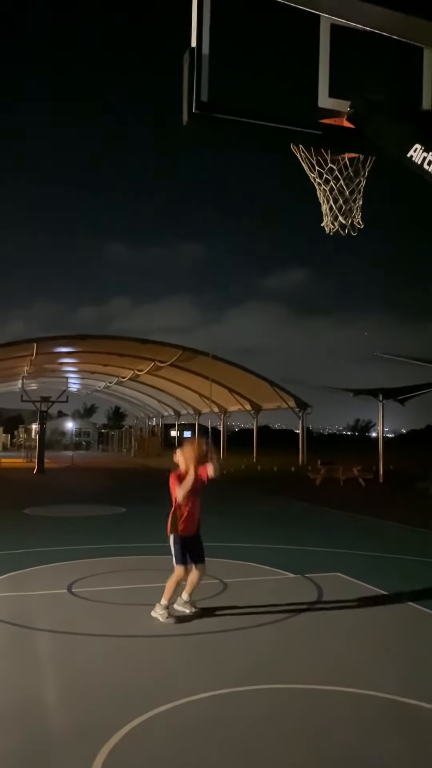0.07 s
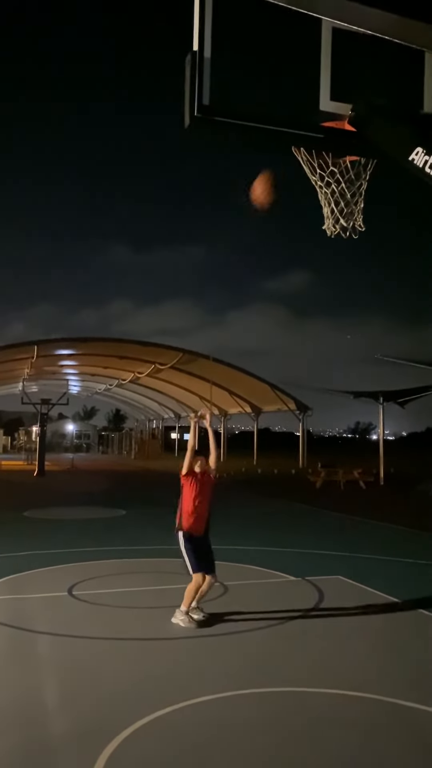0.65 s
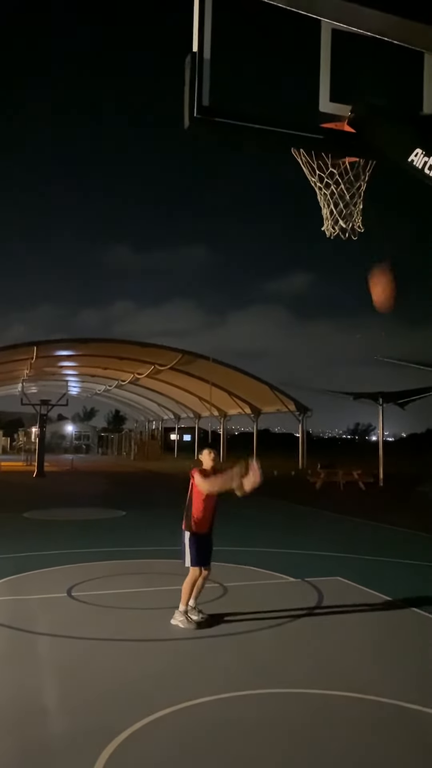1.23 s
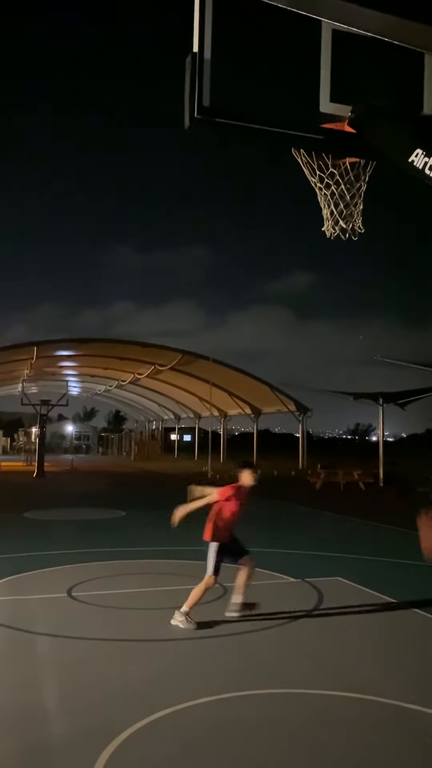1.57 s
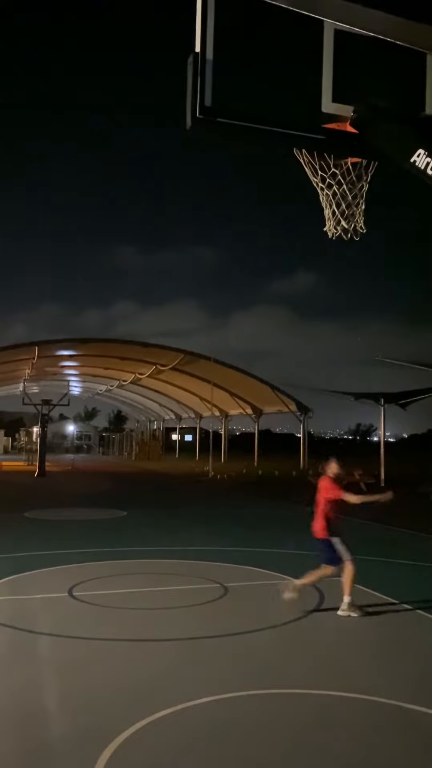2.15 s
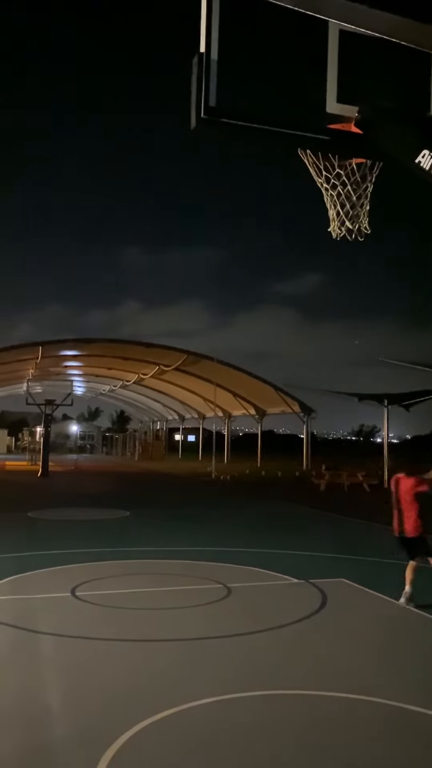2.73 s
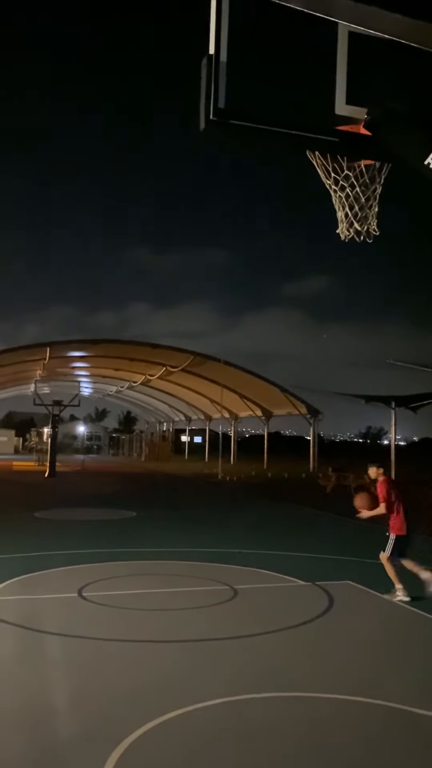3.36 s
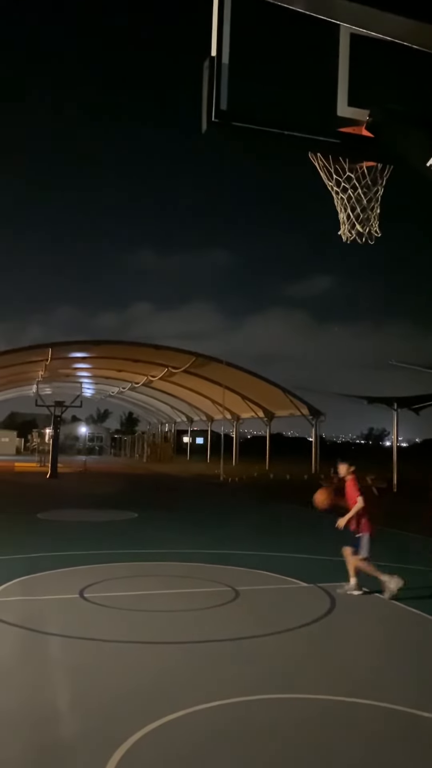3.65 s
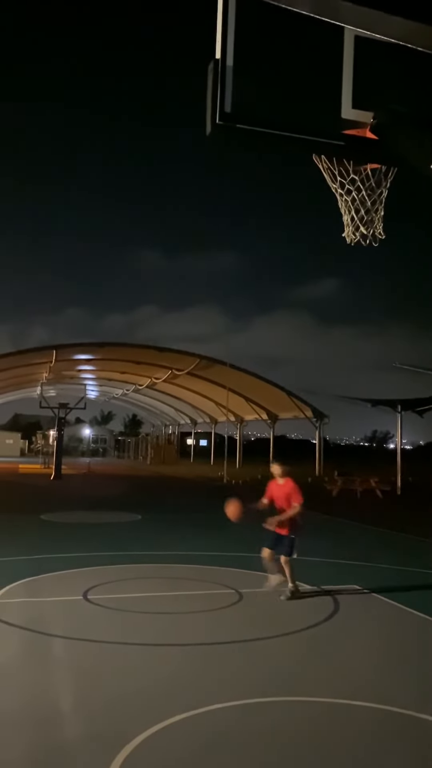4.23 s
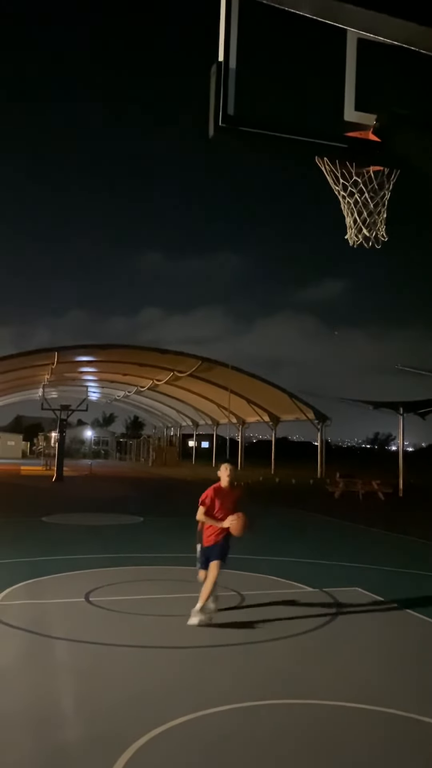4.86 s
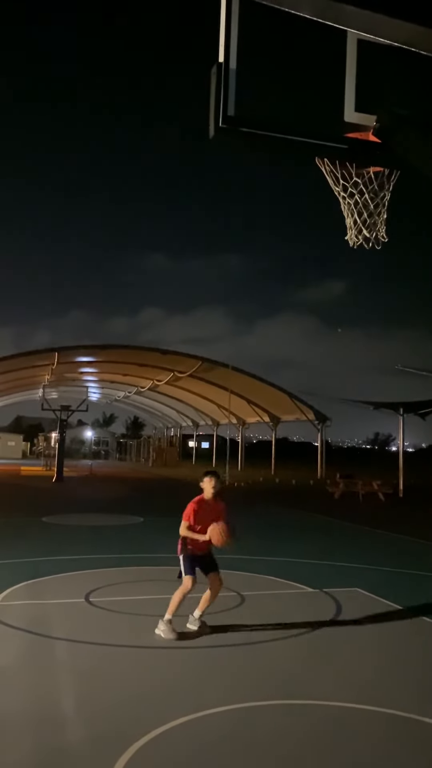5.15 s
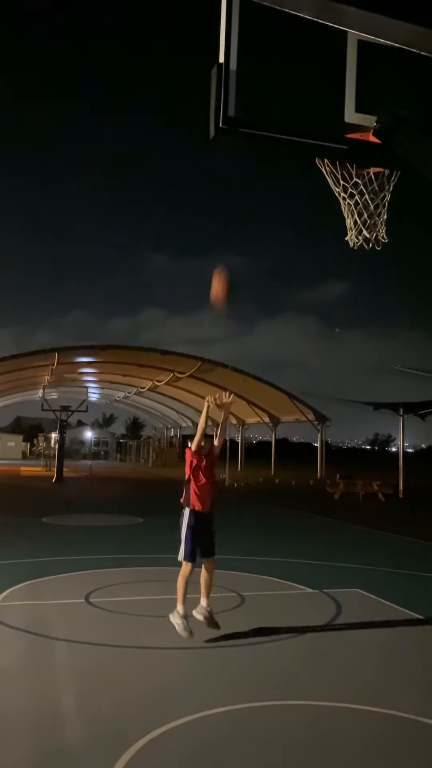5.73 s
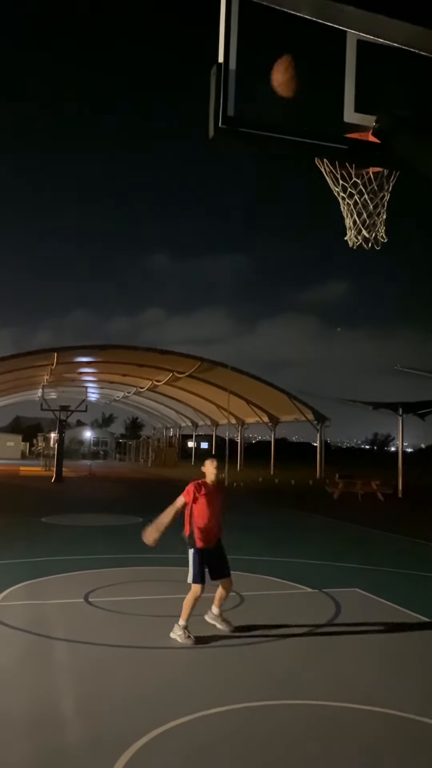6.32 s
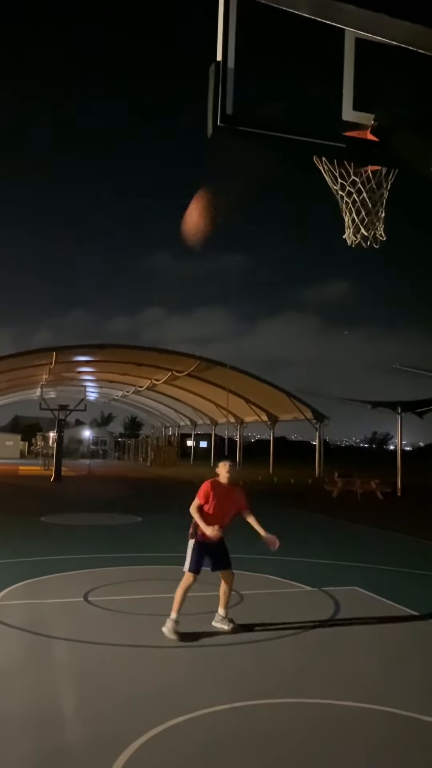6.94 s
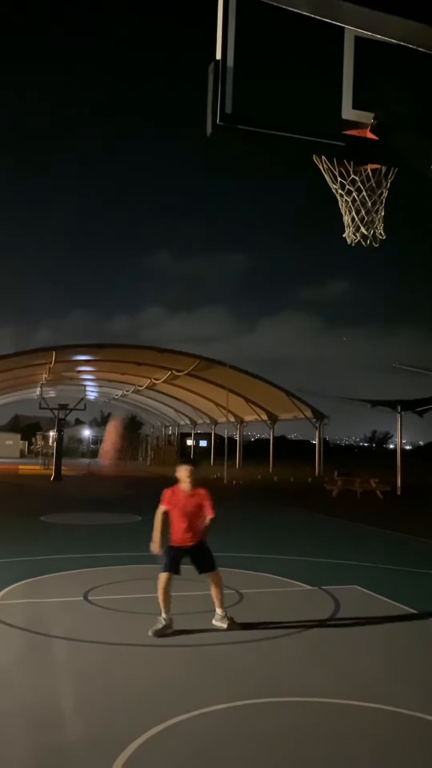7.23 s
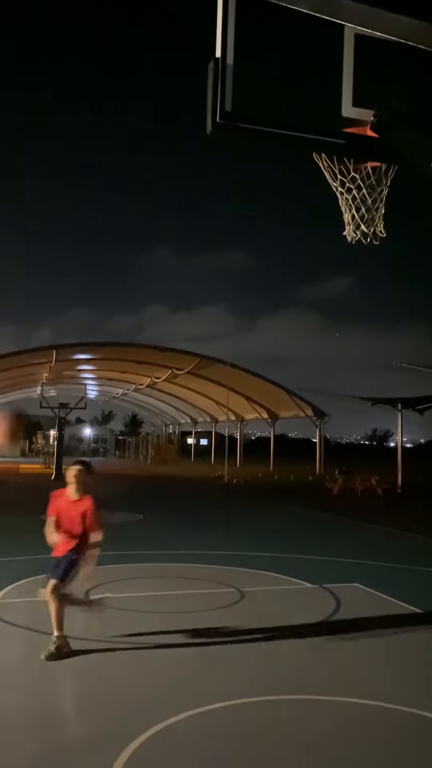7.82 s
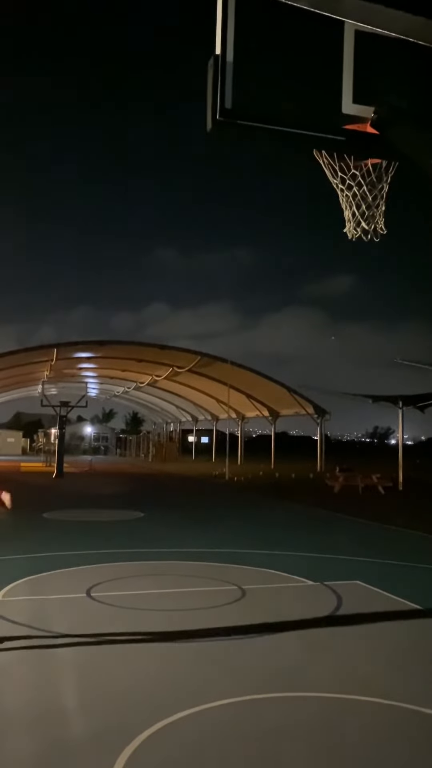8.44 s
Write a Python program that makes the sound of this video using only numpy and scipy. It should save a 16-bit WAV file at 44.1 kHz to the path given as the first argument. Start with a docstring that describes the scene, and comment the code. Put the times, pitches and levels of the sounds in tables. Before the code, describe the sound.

Sharp, echoing basketball bounces, a clattering hoop and booming backboard, and scuffing sneakers, with light wind and distant traffic behind.

```python
"""A basketball bounces three times on a hard outdoor court at night, beside a large roofed hall.
Each impact flattens the ball and excites the modes of its shell and of the air inside. One shot drops
through the net; another sets the steel hoop ringing and the board booming. Soles scuff by friction, hands
slap the ball, and roof, fences and boards return echoes. A light wind buffets the microphone over the
rumble of a distant town."""
import sys
import numpy as np
from scipy import signal
from scipy.fft import rfft, irfft
from scipy.io import wavfile
from scipy.ndimage import uniform_filter1d

SR = 44100
rng = np.random.default_rng(int(sys.argv[2]) if len(sys.argv) > 2 else 0)


def int16_out(signal):
    """Quantize to a 16-bit WAV file."""
    q = np.round(np.clip(np.atleast_2d(signal).T, -1, 1) * 32767)
    wavfile.write(sys.argv[1], SR, q.astype(np.int16))


N = 373968
T = np.arange(N) / SR
LOG_HZ = np.log(np.maximum(np.arange(N // 2 + 1) * SR / N, 1))

# Diffuse sound at the microphone's two ports. Each row: frequency in Hz, left-right correlation.
COHERENCE = [(30, 1), (70, 1), (290, 0.97), (640, 0.44), (1400, 0.71), (3100, -0.51), (7000, -0.18),
             (10500, -0.28), (15000, -.9)]
# Direct sound at the ports. Each row: frequency in Hz, phase difference in radians.
PORT_PHASE = [(300, 0.23), (750, -1.5), (1400, 0.5), (2200, 0.64), (3000, 2), (4500, 1.92), (5800, 1.47),
              (8000, 1.41), (11000, 2.5), (15000, 3.5)]
# Court reverberation. Each row: frequency in Hz, level in dB, T60 (time to fall 60 dB) in seconds.
REVERB_BANDS = [(60, -10.5, 0.95), (173, -14, 0.94), (300, -11, 1), (600, -8.5, 0.72), (1200, -12, 0.79),
                (2380, -11.5, 0.9), (3570, -6.5, 0.96), (4640, -10, 0.42), (7130, -13.5, 0.56),
                (9900, -18, 0.34), (12900, -30, 0.36)]

# Spectra of the noises and of the contact crack. Each row: frequency in Hz, level in dB.
RUMBLE_SPECTRUM = [(12, -60.5), (20, -30), (35, -10), (59, 2), (82, 0), (114, -19), (140, -19.5),
                   (170, -20.5), (220, -50.5), (370, -120)]  # low wind
TOWN_SPECTRUM = [(65, -15), (110, 2), (150, -3), (174, -4.5), (325, -9.5), (444, -18), (536, -16.5),
                 (902, -19), (981, -17.5), (1090, -20.5), (1430, -25.5), (2200, -36), (3150, -47),
                 (4800, -50), (6200, -50.5), (9910, -60), (16000, -76.5)]  # far traffic
RUSTLE_SPECTRUM = [(1200, -28.5), (2400, -9), (3150, -1), (3900, -3), (4700, -22), (7000, -33.5),
                   (12000, -55)]
BUFFET_SPECTRUM = [(25, -14), (60, 5.5), (100, 2.5), (170, -7), (280, -12), (500, -44.5), (1000, -81)]  # slow air on the microphone
FLUTTER_SPECTRUM = [(100, -7), (220, 1.5), (450, 7), (700, 3.5), (900, -11), (1200, -23), (2000, -52),
                    (6000, -60)]  # fast air on the microphone
THUD_SPECTRUM = [(25, -2), (55, 19), (90, 9), (140, -2.5), (220, -24), (400, -32), (900, -78)]
SNAP_SPECTRUM = [(300, -7.5), (900, -14), (1600, 2.5), (2300, -5.5), (3500, -7.5), (6000, -20),
                 (11000, -24), (16000, -24.5)]  # a palm or sole landing flat
SOLE_SPECTRUM = [(1500, -20.5), (3000, -19), (4400, -19.5), (5800, -15.5), (7500, -17), (10000, -10),
                 (11500, -11), (12800, -20.5), (16000, -47.5)]  # rubber on concrete
GRIT_SPECTRUM = [(300, -11), (900, -11), (1500, 2.5), (2300, -5), (3100, -1), (4300, -0.5), (8000, -33),
                 (16000, -60.5)]
CORD_SPECTRUM = [(1500, -5.5), (3000, -4.5), (4600, -8), (5800, -2), (7500, -5), (10000, -2), (11000, -5),
                 (12200, -19.5), (16000, -52)]  # the net whipping
CLATTER_SPECTRUM = [(150, -2.5), (300, 4.5), (450, 0.5), (800, -2.5), (1200, -10.5), (1800, -15),
                    (2400, -16.5), (3200, -25.5), (5000, -31.5), (10000, -41.5)]  # the hoop's loose frame
BOOM_SPECTRUM = [(30, -34), (70, 1.5), (120, 0), (170, 1.5), (260, -10.5), (400, -19), (900, -55.5)]  # the frame's low vibration
SKIN_SPECTRUM = [(300, -13), (1200, 2.5), (2100, -2), (3200, -2.5), (4600, -7.5), (6500, -7.5), (9500, -13),
                 (12000, -19.5), (16000, -46.5)]  # the pebbled ball rubbing the ground
CRACK_SPECTRUM = [(300, -23), (1200, 5.5), (2150, -4.5), (3000, -1), (3700, 4.5), (4600, -10.5),
                  (6000, -4.5), (8000, -6.5), (11000, -8), (13500, -7), (16000, -23)]

# Far rustles. Each row: peak time in seconds, level in dB, Gaussian half-width in seconds.
RUSTLES = [(0.722, -69, 0.013), (2.556, -72, 0.12), (2.98, -72.5, 0.099), (4.658, -82, 0.052),
           (4.942, -69, 0.075), (6.098, -75.5, 0.099), (7.082, -81, 0.088)]
# Gusts on the microphone. Each row: start in seconds, hold in seconds, buffet in dB, flutter in dB.
GUSTS = [(0.055, 0.0052, -25, -35), (0.1, 0.018, -33.5, -34), (0.132, 0.065, -34.5, -35),
         (0.2, 0.027, -34.5, -37.5), (0.344, 0.019, -46, -46)]
# Heavy footfalls and dull bumps. Each row: start in seconds, level in dB, decay in seconds.
THUDS = [(0.788, -32, 0.027), (3.278, -36, 0.067), (4.339, -25, 0.037), (5.091, -49, 0.02),
         (5.435, -35.5, 0.026), (5.704, -37, 0.022), (5.977, -27.5, 0.05)]
# Hands on the ball and light steps. Each row: start in seconds, knock level in dB, knock frequency in Hz,
# snap level in dB, decay in seconds.
TAPS = [(0.3873, -41, 980, -54.5, 0.006), (2.077, -41.5, 810, -43.5, 0.0062),
        (2.309, -39.5, 655, -62, 0.004), (2.726, -53, 700, -44.5, 0.007), (2.738, -31, 510, -68, 0.0099),
        (3.288, -43.5, 665, -63.5, 0.0038), (3.583, -33, 600, -44.5, 0.0021),
        (4.118, -38, 660, -63.5, 0.0047), (4.466, -42.5, 550, -50.5, 0.012),
        (4.98, -60, 898, -49.5, 0.0067), (5.089, -30.5, 228, -46, 0.018), (5.105, -42, 474, -36.5, 0.0042),
        (5.146, -43.5, 600, -46, 0.0046), (5.354, -52, 600, -54, 0.0032), (5.766, -36.5, 780, -57, 0.0053),
        (5.842, -54, 701, -55.5, 0.0086), (7.194, -54, 724, -58, 0.024), (7.248, -40.5, 320, -72, 0.0088),
        (7.915, -46.5, 510, -54, 0.015), (7.966, -38, 920, -65, 0.013), (8.129, -45.5, 790, -53.5, 0.035),
        (8.21, -42.5, 930, -48, 0.015)]
# Soles catching. Each row: start in seconds, length in seconds, frequency in Hz, level in dB.
SQUEAKS = [(2.668, 0.03, 2910, -41), (2.676, 0.028, 2280, -48.5), (5.096, 0.0054, 3140, -32.5),
           (7.965, 0.044, 2820, -53.5)]
# Soles dragging. Each row: start in seconds, length in seconds, final hiss level in dB, growth of the
# hiss in dB, grit level in dB, release in seconds.
SCUFFS = [(1.586, 0.073, -56.5, 6.5, -81, 0.0066), (2.005, 0.063, -48, 15, -60, 0.017),
          (2.305, 0.0075, -47, 3, -58, 0.012), (2.321, 0.05, -42, 1.5, -52, 0.014),
          (2.669, 0.03, -41.5, -2.5, -56, 0.0068), (3.091, 0.075, -71.5, 1, -73.5, 0.0051),
          (3.53, 0.035, -45.5, 18, -66.5, 0.017), (4.362, 0.032, -58, 14, -58, .01),
          (5.087, 0.028, -50.5, -0.5, -50, 0.011), (6.335, 0.0089, -69, -5, -61, 0.0089),
          (7.281, 0.038, -66.5, 12, -65.5, 0.011), (7.627, 0.038, -46.5, 14, -51, 0.0037),
          (7.945, 0.057, -50, 2.5, -50.5, 0.03), (8.154, 0.018, -54.5, 5, -58, 0.01),
          (8.195, 0.1, -53, 1.5, -70, 0.027), (8.294, 0.061, -51, 10, -82, 0.046),
          (8.377, 0.037, -62, -3, -59, .007)]

# Ball against net and hoop. Each row: start in seconds, levels of clatter, cord hiss, boom, steel ring
# and bracket knock in dB, rise in seconds, decay in seconds.
HOOP_HITS = [(.917, -36.5, -45, -52, -41, -34.5, 0.018, 0.025),
             (.955, -41.5, -67, -34, -50.5, -50, .008, .07),
             (.975, -42.5, -57, -50.5, -49.5, -38, .009, 0.031),
             (1.06, -42.5, -54, -54, -42, -49.5, 0.0074, .016),
             (1.138, -50.5, -70, -36.5, -60.5, -51, .01, 0.036),
             (6.504, -33, -49.5, -33, -48, -33, 0.019, 0.041),
             (6.529, -45, -61.5, -23.5, -55, -47, 0.0091, 0.033),
             (6.562, -41, -49, -29, -46, -45, .005, 0.027),
             (6.577, -39.5, -46, -40, -42, -31.5, 0.0062, .016),
             (6.597, -32.5, -58.5, -23, -36.5, -37, .0054, 0.028),
             (6.644, -42.5, -57.5, -28.5, -47.5, -43, .012, 0.037)]
# Modes of the hoop's bracket. Each row: frequency in Hz, relative level in dB, decay in seconds.
BRACKET_MODES = [(437, 0.5, 0.017), (510, -6.5, .015), (807, -4.5, 0.02)]
# Modes of hoop and ball. Each row: frequency in Hz, relative level in dB, T60 in seconds.
RIM_MODES = [(335, -16.5, 0.62), (428, -8.5, 0.92), (790, -16, 0.46), (1153, -13.5, 0.31),
             (2330, -18.5, 0.48), (2680, -27.5, 0.21), (3800, -30, 0.51), (4300, -26.5, 0.17),
             (5400, -23.5, .2), (5550, -29, 0.2)]  # the steel ring
SHELL_MODES = [(400, -25.5, .05), (515, -16.5, 0.11), (633, -19.5, 0.084), (860, -26, .035),
               (1192, -10, 0.019), (1560, -26, 0.035), (2120, -21.5, 0.022), (3600, -27.5, 0.016)]  # the ball's hollow shell
CAVITY_MODES = [(1287, -55, 0.39), (1590, -59, .35), (2110, -53.5, .45), (2655, -53, 0.49),
                (3195, -60, 0.51), (3400, -50.5, 0.53), (3688, -55.5, .5), (3950, -57, .6), (4300, -60, .7),
                (5100, -59, 0.74)]  # the air inside it
# Bounces reflected nearby. Each row: arrival in seconds, slap in dB, slap decay in seconds, thump in dB.
REFLECTIONS = [(1.6808, -22, 0.00065, -34), (1.692, -31, .004, -17), (3.939, -30, 0.0018, -32),
               (3.946, -34, 0.0026, -37), (3.953, -39, 0.0041, -19.5), (7.474, -32.5, 0.00202, -30.5),
               (7.4815, -28.5, 0.0019, -34), (7.495, -35, 0.0044, -23.5)]
# Ball on the ground. Each row: start in seconds, crack in dB, crunch in dB, smack frequency in Hz, smack
# in dB, smack decay in seconds, smack sag as a ratio, slap in dB, shell ring in dB, thump in dB, delay of
# the thump's peak in seconds, its spread in log time, cavity ping in dB, favoured cavity mode in Hz.
BOUNCES = [(1.6541, -1.5, -9.5, 2453, -15, .0009, .05, -24.5, -11.5, -3, 0.011, .37, -1, 2121),
           (3.9116, -18, -18, 2147, -11.5, 0.0013, 0.12, -15, -10.5, -10, 0.008, 0.65, -3, 1590),
           (7.4346, -4, -10.5, 2028, -7.5, 0.0013, 0.33, -13.5, -3.5, -1.8, 0.0096, 0.44, 2.5, 1287)]


def from_db(db):
    """Amplitude grows tenfold for every 20 dB."""
    return np.exp(np.asarray(db) * (np.log(10) / 20))


def rms_one(x):
    """Normalisation to unit power."""
    return x / np.sqrt(np.mean(x ** 2) + 1e-20)


def over_hz(points):
    """Interpolation of (Hz, value) points on a log-frequency axis."""
    hz, value = np.transpose(points)
    return np.interp(LOG_HZ, np.log(hz), value)


def add(track, start, sound):
    """Superposition: a sound joins the track at its start time in seconds."""
    at = max(round(start * SR), 0)
    track[at:at + len(sound)] += sound[:N - at]


def held(attack, length, release):
    """One second of envelope: a linear rise, a hold, then exponential decay."""
    t = T[:SR]
    return np.minimum(t / attack, 1) * np.exp(-np.clip((t - length) / release, 0, 20))


def burst(rise, decay):
    """Envelope of a damped impact: exponential decay straight after the rise."""
    return held(rise, rise, decay)


def noise(spectrum, grain_db=0, ripple_db=0, ripple_hz=113.6):
    """Filtered noise of unit power: millisecond clumps make it gritty, spectral ripple makes it raspy."""
    clumps = np.resize(np.repeat(rng.uniform(-1, 1, N // 44), 44), N)
    grains = rng.standard_normal(N) * from_db(2 * grain_db * clumps)
    ripple = np.interp(np.exp(LOG_HZ) / ripple_hz, np.arange(1000), rng.standard_normal(1000))
    gain = from_db(over_hz(spectrum) + ripple_db * ripple)
    return rms_one(irfft(rfft(grains.astype(np.float32)) * gain.astype(np.float32), N))


def drift(rate_hz):
    """Random modulation of unit spread, lying mostly below the given rate."""
    return noise([(rate_hz / 10, 0), (rate_hz, -3), (10 * rate_hz, -50), (100 * rate_hz, -120)])


def steady(x):
    """Division by the running rms evens out a low noise, so that every blow gets its full weight."""
    return rms_one(x / np.sqrt(uniform_filter1d(x ** 2, size=900) + 1e-3))


def wavering(hz, width_hz):
    """Narrow-band noise is heard as a tone of wandering amplitude and phase; one second, unit power."""
    detuning = (np.arange(SR // 2 + 1) - hz) / width_hz
    return rms_one(irfft(rfft(rng.standard_normal(SR)) / (1 + detuning ** 2), SR))


def click(spectrum):
    """A minimum-phase pulse packs the energy of its spectrum as early as possible; height 1."""
    cepstrum = irfft(np.log(from_db(over_hz(spectrum))), N)
    causal = 2 * cepstrum * (T > 0) * (T < T[-1] / 2)
    pulse = irfft(np.exp(rfft(causal)), N)[:SR]
    return pulse / np.abs(pulse).max()


def diffuse(gain=1):
    """A diffuse field: noise from all around is only partly coherent between the two ports."""
    mid, side = rfft(rng.standard_normal((2, N)))
    coherence = np.clip(over_hz(COHERENCE), -1, 1)
    pair = np.sqrt((1 + coherence) / 2) * mid + np.sqrt((1 - coherence) / 2) * side * [[1], [-1]]
    return irfft(pair * gain, N)


def ports(x):
    """Phase difference: direct sound reaches the ports in step in the bass, out of step in the treble."""
    phase = over_hz(PORT_PHASE) * np.minimum(np.exp(LOG_HZ) / PORT_PHASE[0][0], 1)
    return irfft(rfft(x) * np.exp(.5j * phase * [[1], [-1]]), N)


def wind_and_town(rumble_db=-46.5, town_db=-49, swell_s=2.6, rumble_swell_db=12, town_swell_db=2.5):
    """Wind rumble and far traffic form diffuse fields that swell to a steady level."""
    to_go = np.maximum(1 - T / swell_s, 0)
    rumble = rms_one(diffuse(from_db(over_hz(RUMBLE_SPECTRUM))))
    town = rms_one(diffuse(from_db(over_hz(TOWN_SPECTRUM))))
    return (from_db(rumble_db - rumble_swell_db * to_go) * rumble
            + from_db(town_db - town_swell_db * to_go) * town)


def rustles(flicker_hz=25, flicker_db=3.5):
    """Amplitude modulation of diffuse noise: faint far rustles swell, flicker and fade."""
    level = sum(from_db(db) * np.exp(-.5 * np.minimum(((T - peak_s) / half_s) ** 2, 60))
                for peak_s, db, half_s in RUSTLES)
    flicker = from_db(flicker_db * drift(flicker_hz))
    return level * flicker * rms_one(diffuse(from_db(over_hz(RUSTLE_SPECTRUM))))


def whine(hz=650, width_hz=40, peak_s=3.18, peak_db=-53.5, fade_db_per_s=45):
    """A far narrow-band tone grows and decays exponentially, once."""
    return from_db(peak_db - fade_db_per_s * np.abs(T - peak_s)) * np.resize(wavering(hz, width_hz), N)


def gusts(attack_s=.0024, buffet_release_s=.1, flutter_release_s=.028):
    """Turbulence at the microphone: slow buffets, and a flutter that needs fast air and dies sooner."""
    buffet, flutter = np.zeros((2, N))
    for start, hold, buffet_db, flutter_db in GUSTS:
        add(buffet, start, from_db(buffet_db) * held(attack_s, hold, buffet_release_s))
        add(flutter, start, from_db(flutter_db) * held(attack_s, hold, flutter_release_s))
    return buffet * steady(noise(BUFFET_SPECTRUM)) + flutter * noise(FLUTTER_SPECTRUM, grain_db=5.5)


def court_reverb(x, gap_s=.0079, build_s=.0082):
    """Reverberation: echoes from roof, fences and boards build up after a gap and decay band by band."""
    t, response = T[:2 * SR], 0
    field = rfft(diffuse()[:, :2 * SR])
    log_hz = np.log(np.arange(SR + 1) / 2 + 1)
    centres = np.log([row[0] for row in REVERB_BANDS])
    for (_, db, t60), this_band in zip(REVERB_BANDS, np.eye(len(REVERB_BANDS))):
        band = irfft(field * np.interp(log_hz, centres, this_band))
        rate = np.log(1000) / t60
        response += band * from_db(db) * np.sqrt(2 * rate / SR) * np.exp(-rate * (t - gap_s - build_s))
    onset = np.clip((t - gap_s) / build_s, 0, 1)
    return signal.fftconvolve(x[None], response * onset, axes=1)[:, :N]


def thuds(rise_s=.0046):
    """Soft impacts of the player's weight on the ground excite mainly low frequencies."""
    level = np.zeros(N)
    for start, db, decay in THUDS:
        add(level, start, from_db(db) * burst(rise_s, decay))
    return level * steady(noise(THUD_SPECTRUM))


def taps(knock_q=3.8):
    """A hand or light step excites a damped resonance: a hollow knock with a dry snap on top."""
    knocks, snaps = np.zeros((2, N))
    for start, knock_db, hz, snap_db, decay in TAPS:
        envelope = burst(.0002, decay)
        knock = signal.lfilter(*signal.iirpeak(hz, knock_q, fs=SR), envelope * rng.standard_normal(SR))
        knock = signal.lfilter(*signal.butter(2, 2 * hz, fs=SR), knock)
        add(knocks, start, from_db(knock_db) * knock * np.linalg.norm(envelope) / np.linalg.norm(knock))
        add(snaps, start, from_db(snap_db) * envelope)
    return knocks + snaps * noise(SNAP_SPECTRUM)


def squeaks(width_hz=170, attack_s=.0037, release_s=.008):
    """Stick-slip friction: a rubber sole catches and lets go at an unsteady rate."""
    chirps = np.zeros(N)
    for start, length, hz, db in SQUEAKS:
        add(chirps, start, from_db(db) * held(attack_s, length, release_s) * wavering(hz, width_hz))
    return chirps


def sand(grains_per_s=1200, size_db=2):
    """Grains crushed under a sole tick as a Poisson process, uneven in size; unit power."""
    ticks = (rng.random(N) < grains_per_s / SR) * rng.choice([-1, 1], N)
    sizes = from_db(size_db * np.minimum(rng.exponential(1, N), 3))
    return rms_one(irfft(rfft(ticks * sizes) * from_db(over_hz(SOLE_SPECTRUM)), N))


def tread_rasp(to_go, hz=6500, width_hz=600, slowing=.25):
    """A rough resonance of the tread, different on every step, falls as the shoe slows; unit power."""
    pitch = hz * rng.uniform(.74, 1.2) * (1 + slowing * (to_go - .5))
    roughness = signal.lfilter(*signal.butter(2, width_hz, fs=SR), rng.standard_normal(SR))
    return rms_one(roughness * np.sin(2 * np.pi * np.cumsum(pitch) / SR))


def scuffs(attack_s=.002, catch_hz=45, catch_db=1.5, sand_db=-5, rubber_db=-2, tread_db=-4):
    """Sliding friction: rubber catches unevenly on concrete, with fine hiss, sand and coarser grit."""
    hiss, grit, tread = np.zeros((3, N))
    for start, length, hiss_db, growth_db, grit_db, release_s in SCUFFS:
        slide = held(attack_s, length, release_s)
        to_go = np.maximum(1 - T[:SR] / length, 0)
        pressure = slide * from_db(hiss_db - growth_db * to_go ** 2)
        add(hiss, start, pressure)
        add(tread, start, from_db(tread_db) * pressure * tread_rasp(to_go))
        add(grit, start, slide * from_db(grit_db))
    rubber = from_db(rubber_db) * noise(SOLE_SPECTRUM, grain_db=.5, ripple_db=3.5)
    friction = rubber + from_db(sand_db) * sand()
    catching = from_db(catch_db * drift(catch_hz))
    return catching * (hiss * friction + tread + grit * noise(GRIT_SPECTRUM, grain_db=2, ripple_db=3))


def plunge(cycles=2.47, contact_s=.004):
    """A low chirp whose pitch falls quickly after contact: frequency is cycles / (t + contact_s)."""
    return -np.sin(2 * np.pi * cycles * np.log(1 + T[:SR] / contact_s))


def thump(peak_s, spread):
    """Elastic compression: the falling chirp swells as the ball is squashed and fades as it recovers."""
    return plunge() * np.exp(-.5 * (np.log((T[:SR] + 1e-9) / peak_s) / spread) ** 2)


def hoop(board_hz=139, frame_db=-6, strike_s=.005, looseness=.009, rebound_s=6.559, rebound_db=-13.5):
    """Forced vibration: the ball drags the net and shakes the ring; the frame clatters, the board booms."""
    t = T[:SR]
    clatter, cords, boom, strikes = np.zeros((4, N))
    for start, clatter_db, cord_db, boom_db, ring_db, knock_db, rise, decay in HOOP_HITS:
        for envelope, db in ((clatter, clatter_db), (cords, cord_db), (boom, boom_db)):
            add(envelope, start, from_db(db) * burst(rise, decay))
        for hz, db, knock_s in BRACKET_MODES:
            mode = np.sin(2 * np.pi * hz * rng.uniform(.97, 1.03) * t)
            add(strikes, start, from_db(knock_db + db) * burst(rise, knock_s) * mode)
        for hz, db, t60 in RIM_MODES:
            mode = wavering(hz, width_hz=hz * looseness)
            add(strikes, start, from_db(ring_db + db) * burst(strike_s, t60 / np.log(1000)) * mode)
    # the ball rebounds from the board with a thump of its own
    add(strikes, rebound_s, from_db(rebound_db) * thump(peak_s=.015, spread=.52))
    board = np.sin(2 * np.pi * board_hz * T) + from_db(frame_db) * steady(noise(BOOM_SPECTRUM))
    return (strikes + boom * board + clatter * noise(CLATTER_SPECTRUM, grain_db=1.5)
            + cords * noise(CORD_SPECTRUM, grain_db=3, ripple_db=6.5))


def smack(hz, decay_s, sag, rise_s=.00054):
    """The ball's skin meets the ground in a damped oscillation whose pitch sags."""
    sagging_hz = hz / (1 + sag * T[:SR] / rise_s)
    return burst(rise_s, decay_s) * np.sin(2 * np.pi * np.cumsum(sagging_hz) / SR)


def shell_ring():
    """Heavily damped modes of the ball's shell give a short hollow ring."""
    t = T[:SR]
    return sum(from_db(db - 60 * t / t60) * np.sin(2 * np.pi * hz * t) for hz, db, t60 in SHELL_MODES)


def cavity_ping(favoured_hz, favour_db=7):
    """Cavity resonance: the enclosed air rings on, and each landing favours one mode."""
    ping = np.zeros(SR)
    for hz, db, t60 in CAVITY_MODES:
        nearness = np.exp(-(np.log(hz / favoured_hz) / .1) ** 2)
        ping += from_db(db + favour_db * nearness - 60 * T[:SR] / t60) * wavering(hz, width_hz=25)
    return ping


def bounces(crunch_s=.001, rub_db=-23, rub_s=.018, slap_s=.003, buckle_hz=1250, buckle_db=-21):
    """Impact excitation: the ball cracks, thumps and rings on the ground; nearby surfaces reflect it."""
    ball, skin = np.zeros((2, N))
    crack = click(CRACK_SPECTRUM)
    slap = burst(.00017, slap_s) * plunge()
    crunch = burst(.00034, crunch_s) + from_db(rub_db) * burst(.0013, rub_s)
    buckle = from_db(buckle_db) * burst(.0007, .0015) * np.sin(2 * np.pi * buckle_hz * T[:SR])
    for (start, crack_db, crunch_db, smack_hz, smack_db, smack_s, sag, slap_db, shell_db,
         thump_db, peak_s, spread, ping_db, favoured_hz) in BOUNCES:
        add(skin, start, from_db(crunch_db) * crunch)
        add(ball, start, from_db(crack_db) * crack + from_db(slap_db) * slap)
        add(ball, start, from_db(smack_db) * smack(smack_hz, smack_s, sag))
        add(ball, start, from_db(thump_db) * thump(peak_s, spread))
        add(ball, start + .85 * peak_s, from_db(thump_db) * buckle)  # the shell buckles near full squash
        add(ball, start, from_db(shell_db) * shell_ring() + from_db(ping_db) * cavity_ping(favoured_hz))
    for arrival, slap_db, smear_s, thump_db in REFLECTIONS:
        add(skin, arrival, from_db(slap_db) * burst(.0006, smear_s))
        add(ball, arrival, from_db(thump_db) * thump(peak_s=.013, spread=.4))
    return ball + skin * noise(SKIN_SPECTRUM, grain_db=1.5)


def scene(hoop_echo_db=4, scuff_echo_db=1):
    """Direct and reverberant sound of ball, hoop and player are superposed on wind and town."""
    ball, basket, shoes, hands = bounces(), hoop(), scuffs(), taps()
    echoes = court_reverb(ball + from_db(hoop_echo_db) * basket + from_db(scuff_echo_db) * shoes + hands)
    direct = ports(ball + basket + shoes + squeaks() + hands + thuds() + gusts() + whine())
    return direct + echoes + rustles() + wind_and_town()


def record(dry, low_cut_hz=30, high_cut_hz=16200):
    """Band limiting: the deepest bass is rolled off and the top is cut steeply."""
    thinned = signal.sosfilt(signal.butter(2, low_cut_hz, "high", fs=SR, output="sos"), dry)
    return signal.sosfilt(signal.ellip(10, .1, 80, high_cut_hz, fs=SR, output="sos"), thinned)


dry = scene()
out = record(dry)
int16_out(out)
```